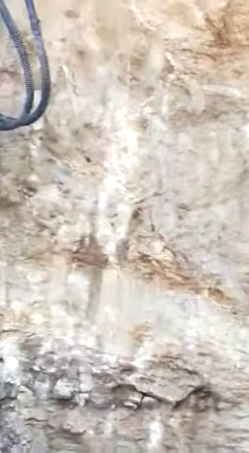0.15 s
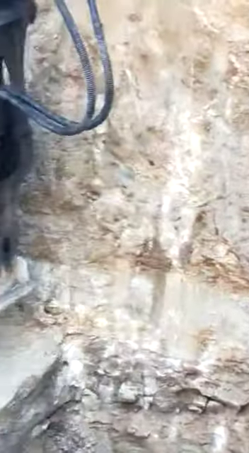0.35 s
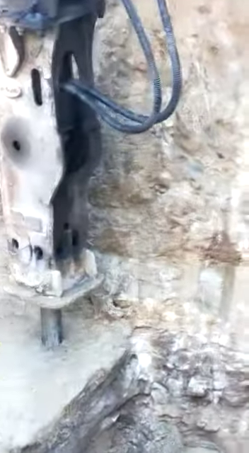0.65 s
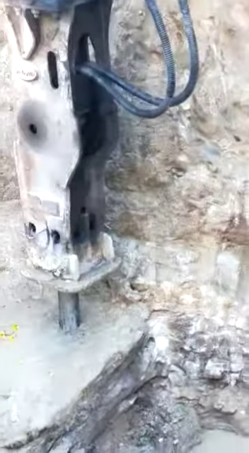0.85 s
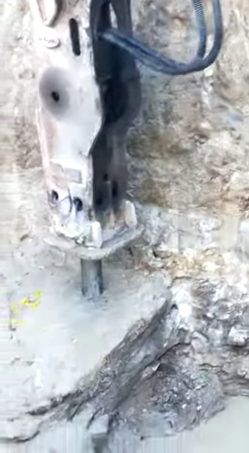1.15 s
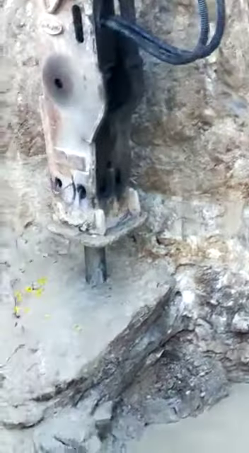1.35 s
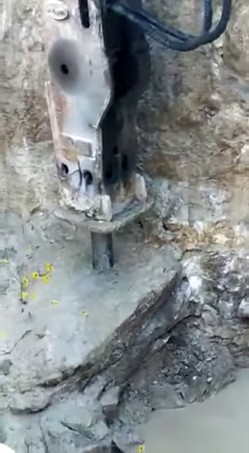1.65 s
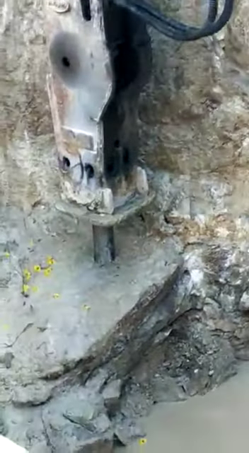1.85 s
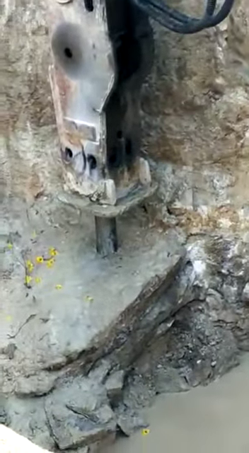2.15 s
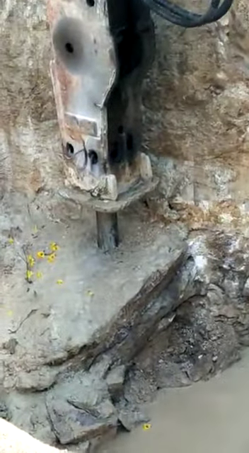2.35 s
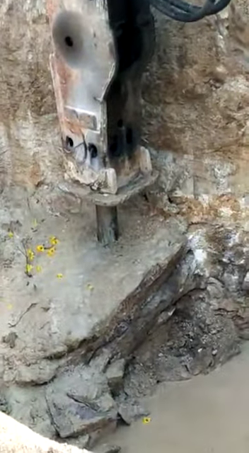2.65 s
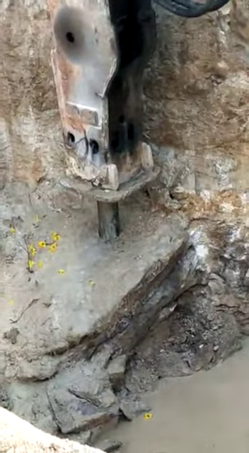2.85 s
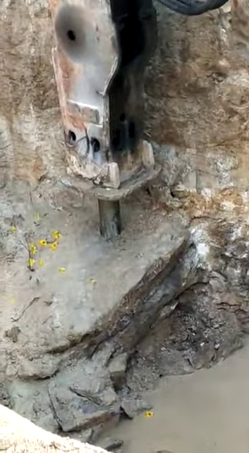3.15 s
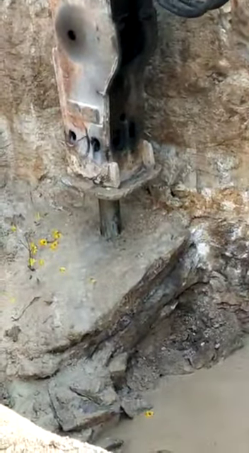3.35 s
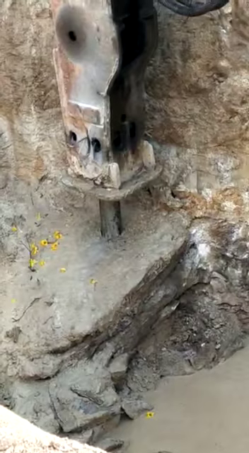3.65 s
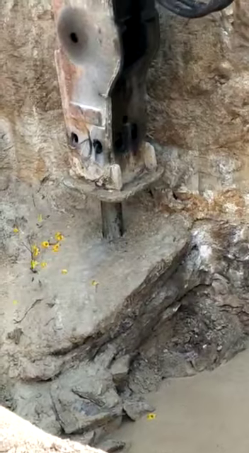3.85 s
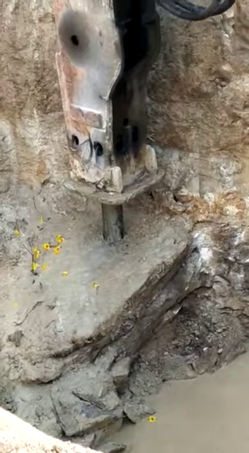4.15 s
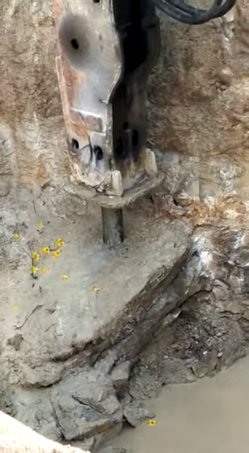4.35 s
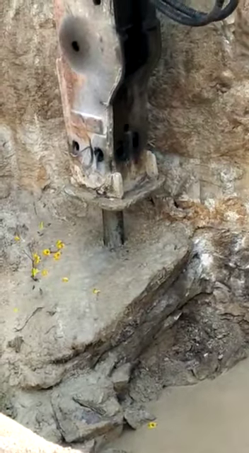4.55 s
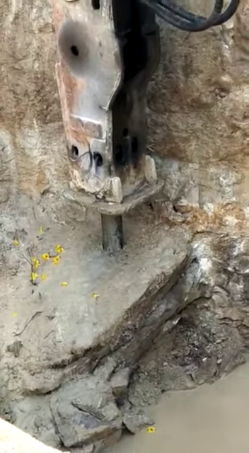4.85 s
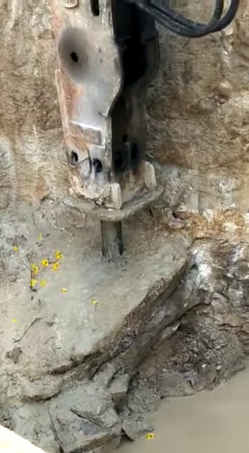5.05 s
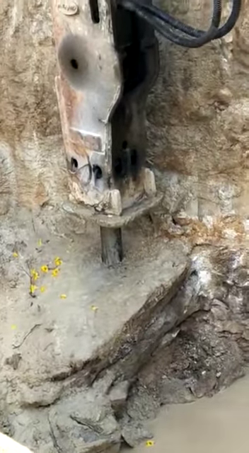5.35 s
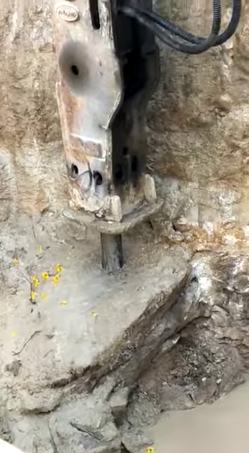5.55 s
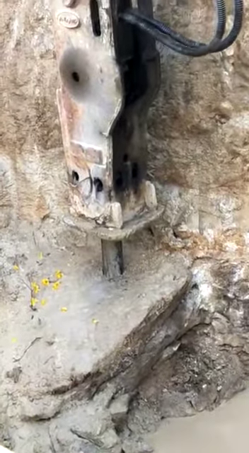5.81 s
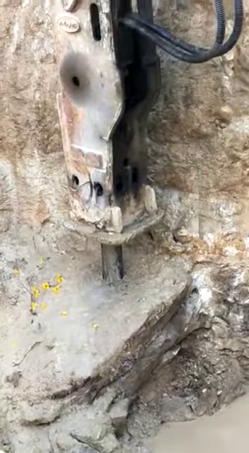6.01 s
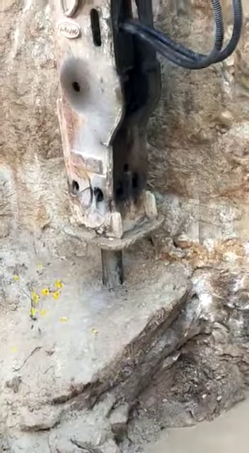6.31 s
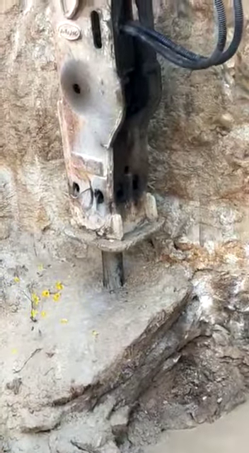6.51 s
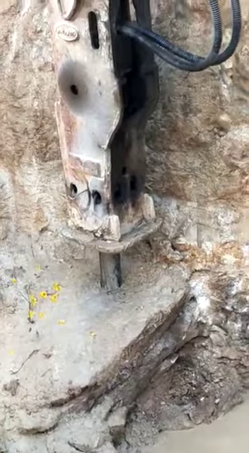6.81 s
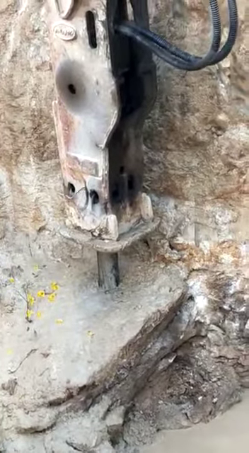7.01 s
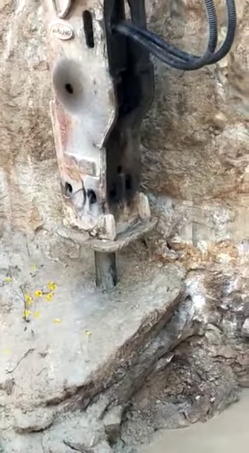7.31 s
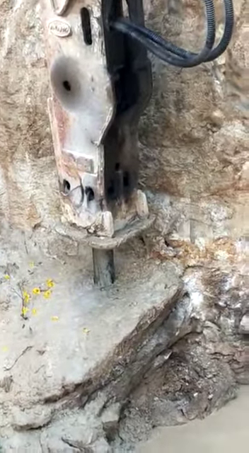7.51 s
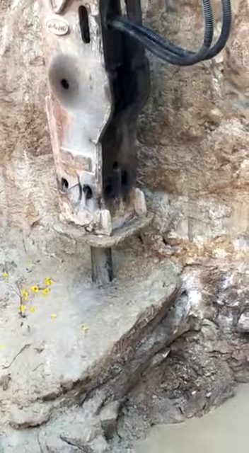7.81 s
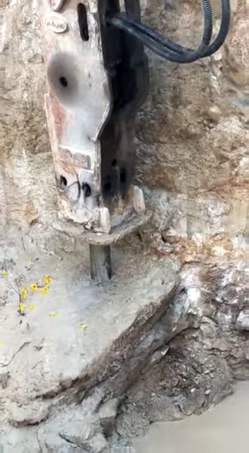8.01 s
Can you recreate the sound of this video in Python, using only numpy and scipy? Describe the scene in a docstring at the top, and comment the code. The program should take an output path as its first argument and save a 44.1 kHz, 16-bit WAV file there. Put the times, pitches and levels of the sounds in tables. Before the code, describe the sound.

Four runs of machine-fast hammering in a rocky pit: a short burst, a pause, then two longer runs separated by brief gaps, and a last run that continues to the end. Blows clank and ring nearly alike, with a quick rising ring between them. In the gaps echoes die, a diesel hums, the pump whines faintly and steel squeaks once on stone. Sound sits heavily right, with a dull left side.

```python
"""A hydraulic breaker on an excavator hammers rock in a pit, about 12.6 blows a second, with three short pauses.
Each blow sets off one fixed burst of steel clatter and pit echo, fresh rock noise and a set of ringing modes.
Valve hiss precedes each blow; noise and wavering tones make the pump whine in the pauses; a diesel hums behind.
The camera's left microphone port is covered, so that side is faint and muffled; the right port is open."""
import sys
import numpy as np
from scipy import signal
from scipy.fft import rfft, irfft, next_fast_len
from scipy.io import wavfile
from scipy.ndimage import uniform_filter1d, map_coordinates

SR = 44100
rng = np.random.default_rng(int(sys.argv[2]) if len(sys.argv) > 2 else 0)


def bounce(signal):
    """Save signal as a 16-bit WAV file at the path given by the first command-line argument."""
    frames = np.transpose(np.atleast_2d(signal))
    limited = np.clip(frames, -1, 1)
    pcm = np.round(limited * 32767).astype(np.int16)
    wavfile.write(sys.argv[1], SR, pcm)


N = 360297
SIZE = next_fast_len(N + SR)  # padded transform length, samples
HZ = np.fft.rfftfreq(SIZE, 1 / SR)
TIME = np.arange(N) / SR  # s

# last blows before a pause rattle loose: start_s, level_db
LOOSE_BLOWS = [(.571, -13.5), (3.287, -37), (5.29, -30)]


def amp(db):
    """Decibels to gain."""
    return 10 ** (np.asarray(db) / 20)


def unit(x):
    """Scale to rms 1."""
    return x / np.sqrt(np.mean(x ** 2) + 1e-20)


def along(points):
    """(Hz, value) points joined on a log axis, for every frequency."""
    f, v = np.transpose(points)
    return np.interp(np.log(HZ + 1), np.log(f + 1), v)


def lifts(resonances):
    """dB curve of a set of (Hz, width Hz, lift dB) resonances."""
    return sum(db / (1 + (2 * (HZ - hz) / width) ** 2) for hz, width, db in resonances)


def causal(gain):
    """Minimum-phase response with this gain: it rings only after a hit."""
    cepstrum = irfft(np.log(np.maximum(gain, 1e-6)), SIZE)
    # fold the mirrored half forward in time
    cepstrum[1:SIZE // 2] *= 2
    cepstrum[SIZE // 2 + 1:] = 0
    return np.exp(rfft(cepstrum))


def filtered(x, response):
    """x through a frequency response."""
    return irfft(rfft(x, SIZE) * response, SIZE)[:N]


def noise(colour_db):
    """Coloured noise of rms 1."""
    return unit(filtered(rng.standard_normal(N), amp(colour_db)))


def echo(t60):
    """A diffuse echo of energy 1, as a frequency response."""
    tail = rng.standard_normal(SR // 2) * amp(-60 * TIME[:SR // 2] / t60)
    return rfft(tail / np.linalg.norm(tail), SIZE)


def wobble(rate):
    """A smooth curve through random values, rate of them a second."""
    return map_coordinates(rng.standard_normal(1000), [TIME * rate], mode="mirror")


def strokes(blows, lead=0):
    """One impulse per blow, lead seconds ahead of it."""
    s, db = np.transpose(blows)
    samples = np.clip(np.round((s - lead) * SR).astype(int), 0, N - 1)
    return np.bincount(samples, amp(db), N)


def levelled(response, width_hz):
    """Even out the broad peaks and dips of an impulse response, keeping its fine echo pattern."""
    spectrum = rfft(response, SIZE)
    power = uniform_filter1d(abs(spectrum) ** 2, max(int(width_hz * SIZE / SR), 1))
    flat = irfft(spectrum / np.sqrt(abs(power) + 1e-9), SIZE)
    return rfft(flat[:len(response)], SIZE)


def pump_whine():
    """Hydraulic pump: resonant noise and wavering tones that swell while it takes up load."""
    # load that presses the chisel down before a run: start_s, length_s, gain_db
    loads = [(0.91, 0.12, -48), (3.42, .29, -50), (5.44, 0.31, -51.5)]
    # pump and hose resonances: centre_hz, width_hz, lift_db
    resonances = [(1510, 480, 17), (1700, 83, 18), (2180, 63, 22), (3400, 110, 14.5), (4786, 70, 16)]
    # broad colour of the pump noise: freq_hz, relative_db
    pump_colour = [(100, -11), (900, -4), (2000, -10.5), (3500, -22), (6000, -19), (9000, -52.5),
                   (16000, -42)]
    # notes of the pump: pitch_hz, wander_scale_hz, relative_db
    notes = [(1550, 50, -5), (2130, 18, -12)]
    wander_rate = 19  # random values per s
    rise_s, fall_s = 0.077, 0.05

    whine = 0.6 * noise(along(pump_colour) + lifts(resonances))
    for hz, wander, db in notes:
        waver = 1 + 1.2 * noise(along([(25, 0), (80, -5), (300, -65.0)]))
        pitch = hz + wander * wobble(wander_rate)
        whine += amp(db) * waver * np.sin(2 * np.pi * np.cumsum(pitch) / SR)
    load = 0
    for s, length, db in loads:
        corners = [0, rise_s, length, length + fall_s]
        load = load + amp(db) * np.interp(TIME - s, corners, [0, 1, 1, 0])
    return load * whine


def excavator(rumble_db):
    """The diesel hums steadily on exhaust tones and rumbling noise; the pump whines with its load."""
    # diesel exhaust tones: pitch_hz, rms_level_db
    exhaust = [(86.5, -56), (144, -61), (173, -59.5)]
    # colour of the engine rumble: freq_hz, relative_db
    rumble_colour = [(15, -53), (25, -20), (101, -4), (769, -16), (978, -29), (1720, -11.5), (1910, -16),
                     (2180, -21), (3930, -39), (5280, -32.5), (15000, -70)]
    hum = 0
    for hz, db in exhaust:
        hum = hum + amp(db) * np.sqrt(2) * np.sin(2 * np.pi * (hz * TIME + rng.random()))
    return hum + pump_whine() + amp(rumble_db) * noise(along(rumble_colour))


def squeaks():
    """Steel slips on stone: a short sinking tone that lingers in the pit."""
    # chisel shifting on the rock: start_s, level_before_echo_db, start_hz, end_hz, length_s
    slips = [(3.545, -33, 1070, 672, 0.039), (3.682, -38, 716, 640, .02)]
    out = np.zeros(N)
    for s, db, start_hz, end_hz, length in slips:
        t = np.maximum(TIME - s, 0)
        pitch = end_hz + (start_hz - end_hz) * np.exp(-t / 0.0144)
        shape = (1 - np.exp(-t / 0.0027)) * np.exp(-(t / length) ** 2)
        out += amp(db) * shape * np.sin(2 * np.pi * np.cumsum(pitch) / SR)
    return filtered(out, 0.58 + 0.78 * echo(t60=0.29))


def valve(blows, db, lead, length):
    """Oil spits through the control valve ahead of each blow, and surges on first strokes after a pause."""
    # hiss of oil through the valve: freq_hz, relative_db
    hiss_colour = [(100, -6), (700, 5.5), (2200, 1), (3600, 0), (4800, 6.5), (6500, -9), (10000, -16.5),
                   (13000, -15), (15000, -8.5)]
    # first stroke after a pause, oil rushes in: start_s, level_db
    rushes = [(1.04, -37), (3.685, -33), (5.713, -34)]
    t = TIME[:SR // 10]
    spit = (1 - np.exp(-(t / 0.00058) ** 2)) * np.exp(-(t / length) ** 2)
    hiss = amp(db) * signal.fftconvolve(strokes(blows, lead), spit)[:N] * noise(along(hiss_colour))
    surge = 0
    for s, level in rushes:
        # swells, holds, then stops at once
        surge = surge + amp(level) * np.interp(TIME - s, [-0.015, 0.019, 0.053], [0, 1, 1], right=0)
    surge_colour = [(80, -6), (600, 5), (2200, -10.0), (5200, -7), (8000, -22), (15000, -29)]
    return hiss + surge * noise(along(surge_colour))


def loose_rattle(length, ring_hz):
    """With the load taken off, the chisel chatters in its bushing and rings freely: decaying resonant noise."""
    level = 0
    for s, db in LOOSE_BLOWS:
        t = np.maximum(TIME - s, 0)
        level = level + amp(db) * (1 - np.exp(-t / 0.0055)) * np.exp(-t / length)
    colour = along([(200, -10), (700, 4), (1300, -2), (2400, -1), (3800, -17), (5200, -10),
                    (9000, -35.5), (13000, -41), (14500, -22)])
    return level * noise(colour + lifts([(ring_hz, 30, 15)]))


def piston_return(blows, db, start_hz, end_hz, delay, glide, fade):
    """While the hammer keeps cycling, a ring climbs in pitch as the piston is pushed back up."""
    t = TIME[:SR // 8]
    pitch = end_hz + (start_hz - end_hz) * np.exp(-t / glide)
    shape = (1 - np.exp(-(t / 0.0031) ** 2)) * np.exp(-t / fade)
    ring = shape * np.sin(2 * np.pi * np.cumsum(pitch) / SR)
    # no return stroke after a loose last blow
    cycling = np.all([abs(TIME - delay - s) > .02 for s, _ in LOOSE_BLOWS], axis=0)
    return amp(db) * signal.fftconvolve(strokes(blows, -delay) * cycling, ring)[:N]


def recoil(blows):
    """Every blow kicks boom, housing and chisel into their strongest modes; the deepest bass does not radiate."""
    # modes from the boom up to the chisel: pitch_hz, relative_db, rise_s, t60_s
    modes = [(93.9, -6, 0.02, 0.064), (161.3, -13.5, 0.0083, 0.2), (176.3, -14, 0.00051, 0.095),
             (208, -23, 0.037, 0.34), (809.5, -15, 0.0092, 0.097), (911.4, -18.5, 0.014, 0.24),
             (1254, -7, 0.00077, 0.019), (3272, -28, 0.016, 0.27), (4285, -18.5, 0.0042, 0.061)]
    thump_db, thump_db_per_s = -1.7, 0.3  # the modes grow as the chisel beds in
    t = TIME[:SR // 2]
    ring = 0
    for hz, db, rise, t60 in modes:
        shape = amp(db - 60 * t / t60) * (1 - np.exp(-(t / rise) ** 2))
        ring = ring + shape * np.sin(2 * np.pi * hz * t)
    kicks = strokes(blows) * amp(thump_db + thump_db_per_s * TIME)
    radiated = amp(along([(25, -11), (50, -3), (75, 0)]))
    return filtered(signal.fftconvolve(kicks, ring)[:N], radiated)


def piston():
    """One row (s, relative dB) per blow: the piston cycles at the striking rate until a run's stop is reached."""
    # runs of hammering; the piston hesitates on its first stroke, catches up on the second, may limp long-short:
    # first_blow_s, stop_s, first_stroke_longer_s, second_stroke_shorter_s, last_stroke_longer_s, limp_s,
    # first_blow_relative_db, last_blow_relative_db
    runs = [(.01, .53, 0, 0, .0062, 0, 0, -2.5), (1.059, 3.25, .0167, .004, 0, 0, -1.8, 0),
            (3.7034, 5.25, .0091, 0, 0, 0, -1.6, 0), (5.731, 8.08, .0169, .0055, 0, .0009, -1.5, 0)]
    # the striking rate drifts with the oil flow: time_s, blows_per_s
    striking_rate = [(0, 12.628), (1.45, 12.698), (1.9, 12.579), (2.6, 12.676), (3.2, 12.596),
                     (4.1, 12.721), (4.7, 12.631), (5.2, 12.757), (5.9, 12.634), (6.6, 12.545),
                     (7.5, 12.686), (8.1, 12.75)]
    blow_db, scatter_db, jitter_s = -0.32, 0.49, .0001  # common level; chance in level and timing

    rows = []
    for s, stop, hesitation, catch_up, last_late, limp, first_db, last_db in runs:
        run = [[s, first_db]]
        while s < stop:
            stroke = len(run)
            s += 1 / np.interp(s, *np.transpose(striking_rate)) + limp * (-1) ** stroke
            s += hesitation * (stroke == 1) - catch_up * (stroke == 2)
            run.append([s, 0])
        run[-1] = [s + last_late, last_db]
        rows += run
    chance = rng.standard_normal((len(rows), 2)) * [jitter_s, scatter_db]
    return np.array(rows) + [0, blow_db] + chance


def hammer(blows, db, lead):
    """Each blow is a burst of steel clatter and pit echo: one fixed pattern, plus crushing rock that never repeats."""
    # broad colour of a blow: freq_hz, relative_db
    blow_colour = [(30, -41), (60, -36.5), (85, -16), (120, -26.5), (170, -20.5), (250, -21.5), (550, -24),
                   (1000, -25), (1700, -19.5), (2500, -24), (3800, -29), (5300, -23), (6300, -30.5),
                   (9500, -47.5), (15500, -43)]
    # resonances of housing and chisel: centre_hz, width_hz, lift_db
    steel = [(299.4, 24.5, 5.5), (370.4, 327, 13), (537.3, 19.5, 6.5), (663, 112, 11), (702, 85, 2),
             (781, 77, 11.5), (928, 38, 14), (993, 41, 13), (1098, 73, 13.5), (1287, 204, 10.5),
             (1420, 28, -0.5), (1477, 19, 7), (1600.4, 19, 10), (1823, 53, 5.5), (2022, 82, 5),
             (2111, 56, 10.5), (2310, 92, 5.5), (2835, 180, 5), (3012, 187, 7), (3246, 54, 14),
             (4307, 187, 9.5), (4670, 145, 8), (4997, 95, 8), (5490, 125, 10.5), (6790, 140, 6.5),
             (7310, 240, 4), (7830, 120, 9), (9200, 240, 8)]
    # how a blow dies away: band_hz, rise_s, clatter_length_s, pit_echo_relative_db, echo_t60_s
    decay = [(91, 0.015, 0.0034, -4, 0.45), (337, 0.0029, 0.0091, 1, 0.32),
             (1065, 0.0018, 0.012, -7.5, 0.41), (2340, 0.00093, 0.02, -3.5, 0.32),
             (4270, 0.006, 0.017, -13, 0.38), (9000, 0.0019, 0.014, -4, 0.29),
             (15000, 0.0029, 0.015, -10, 0.27)]
    # part of the power that changes from blow to blow: freq_hz, share_0_to_1 (kept within .01 to .99)
    fresh_share = [(60, 1), (200, 0.1), (1000, 0.04), (2300, 0.2), (5000, 0.28), (9000, .65), (15000, 0.9)]

    hits, t = strokes(blows, lead), TIME[:int(.7 * SR)]
    pattern, grit = rng.standard_normal(N), rng.standard_normal(N)
    same, fresh = np.zeros(len(t)), np.zeros(N)
    for row, (hz, rise, length, echo_db, t60) in enumerate(decay):
        # a band that fades out towards its neighbours
        band = along([(other[0], k == row) for k, other in enumerate(decay)])
        clatter = 1 / (1 + (t / length) ** 4)
        pit_echo = amp(echo_db - 60 * t / t60)
        shape = (1 - np.exp(-(t / rise) ** 2)) * np.hypot(clatter, pit_echo)
        shape /= np.linalg.norm(shape)
        same += shape * filtered(pattern, band)[:len(t)]
        # unrelated bursts overlap in power, not in amplitude
        power = abs(signal.fftconvolve(hits ** 2, shape ** 2)[:N])
        fresh += np.sqrt(power) * filtered(grit, band)
    share = np.clip(along(fresh_share), .01, .99)
    bursts = filtered(hits, levelled(same, width_hz=39) * np.sqrt(1 - share))
    bursts += filtered(fresh, np.sqrt(share))
    return amp(db) * filtered(bursts, causal(amp(along(blow_colour) + lifts(steel))))


def covered_port(sound, scatter_db, lag):
    """Bass leaks in past the cover; the rest comes through it faint and late, its treble scattered."""
    # the cover over the left port loosens: time_s, bass_leak_db
    loosening = [(.6, -25), (1.1, -13.5), (1.7, -10.5), (2.3, -1.5), (6.3, -1), (8.17, 3)]
    # colour of what passes the gap, and of what passes the cover: freq_hz, relative_db
    gap_colour = [(30, -2), (85, -0.5), (150, -9), (280, -12), (370, -16), (470, -21), (700, -26.5),
                  (3000, -52)]
    cover_colour = [(100, -39.5), (450, -42), (620, -30.5), (1000, -23.5), (1320, -33), (1750, -27.5),
                    (2400, -29), (3000, -39), (3900, -32), (5000, -50), (7000, -29), (10000, -24.5),
                    (14000, -62)]
    leak_db = np.interp(TIME, *np.transpose(loosening))
    gap = amp(leak_db) * filtered(sound, causal(amp(along(gap_colour))))
    scatter = amp(scatter_db + along([(700, -20), (2000, 2)])) * echo(t60=0.17)
    path = np.exp(-2j * np.pi * HZ * lag) + scatter
    through = filtered(sound, causal(amp(along(cover_colour))) * path)
    return gap + amp(0.34 * leak_db + 0.5) * through


def scene():
    """The breaker and its carrier, heard by a covered left port and an open right one (levels dB, times s)."""
    blows = piston()
    sound = excavator(rumble_db=-55.0) + squeaks()
    sound += valve(blows, db=-27.5, lead=0.0178, length=0.02)
    sound += loose_rattle(length=0.036, ring_hz=1440)
    sound += piston_return(blows, db=-13, start_hz=649, end_hz=1299, delay=.013, glide=0.026, fade=0.014)
    sound += recoil(blows) + hammer(blows, db=40.5, lead=0.000801)
    return np.array([covered_port(sound, scatter_db=-7, lag=0.00057), sound])


def record(dry):
    """The camera rounds off the highest peaks and keeps nothing above its band limit."""
    top_hz = 15900
    rounded = dry / (1 + (abs(dry) / .85) ** 6) ** (1 / 6)
    return np.array([filtered(channel, HZ < top_hz) for channel in rounded])


dry = scene()
out = record(dry)
bounce(out)
```